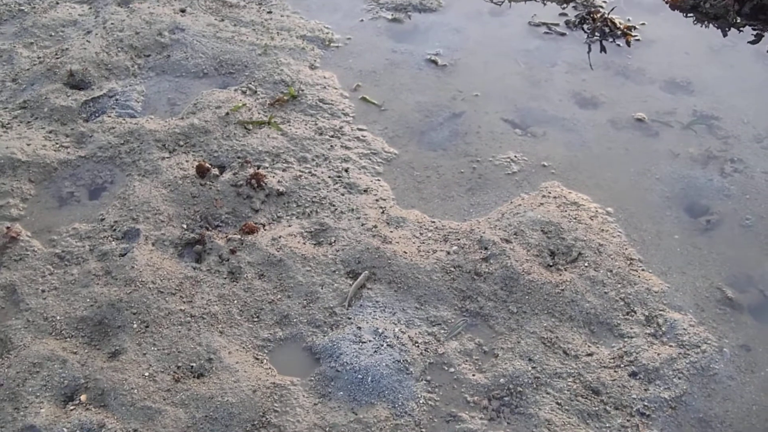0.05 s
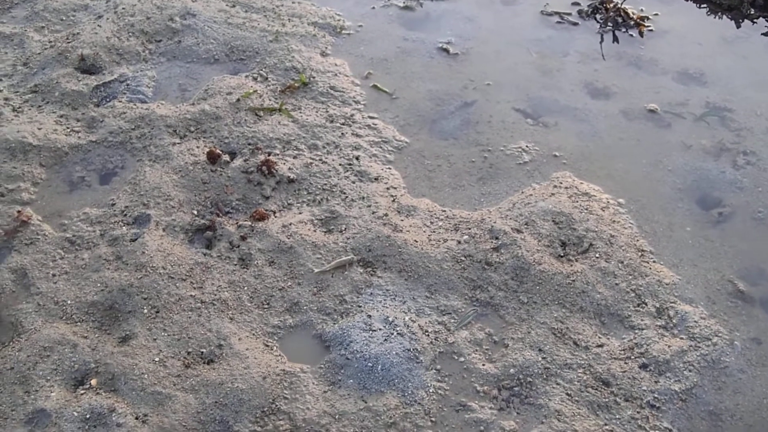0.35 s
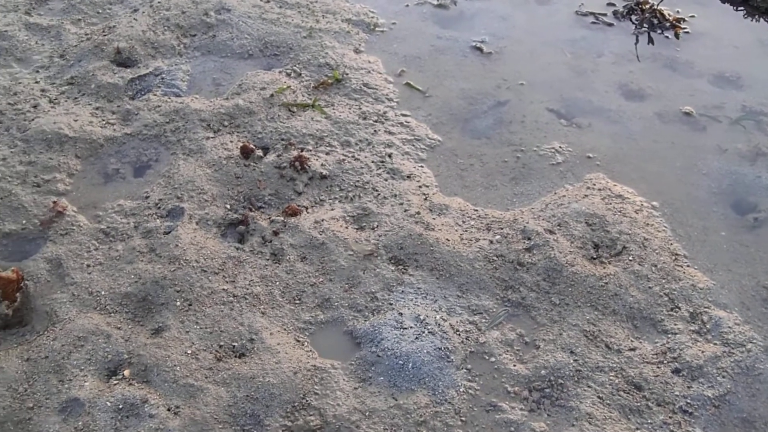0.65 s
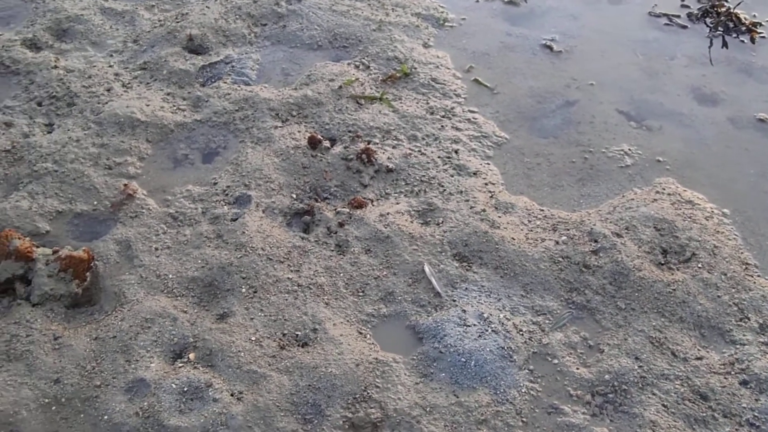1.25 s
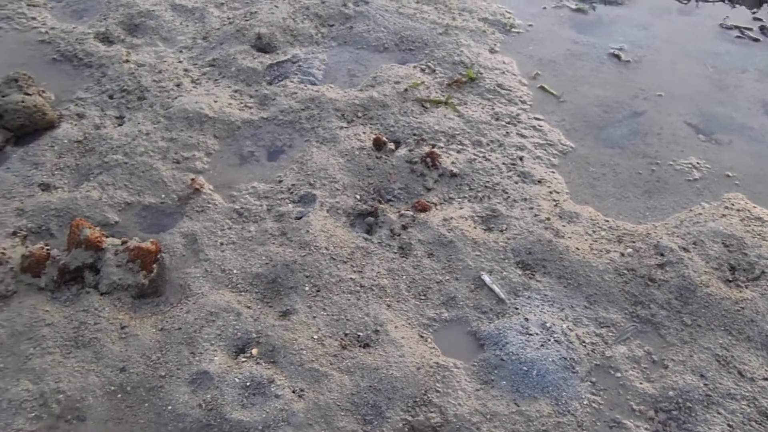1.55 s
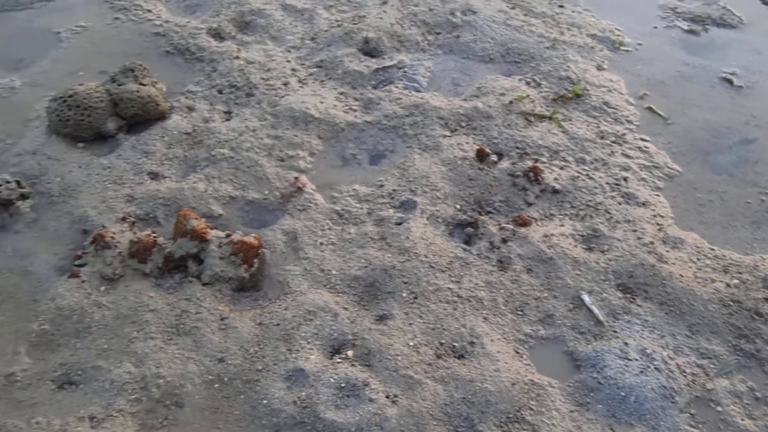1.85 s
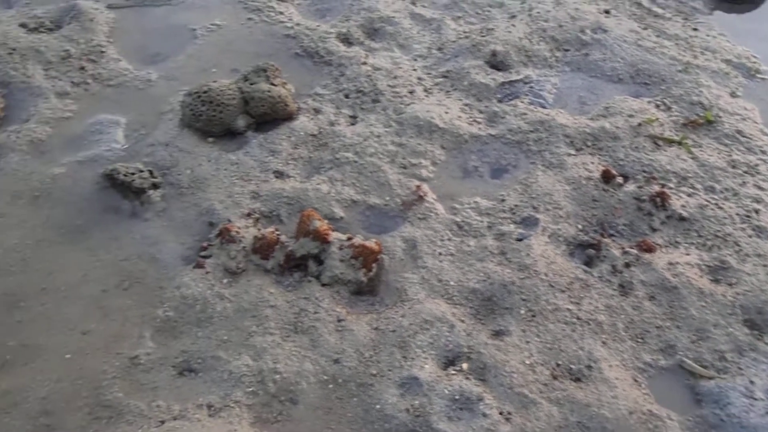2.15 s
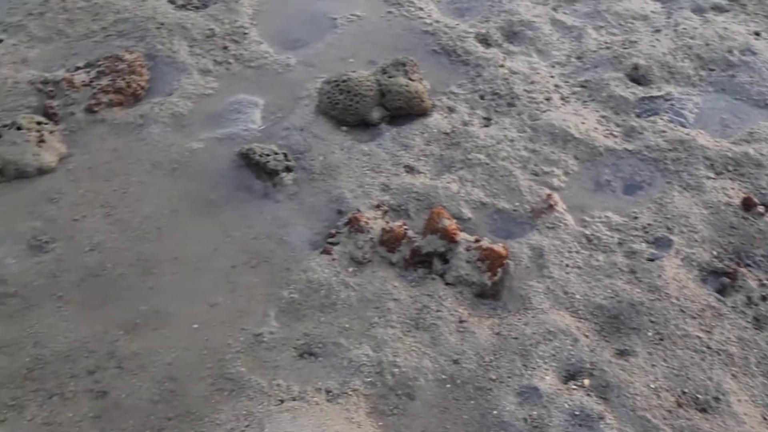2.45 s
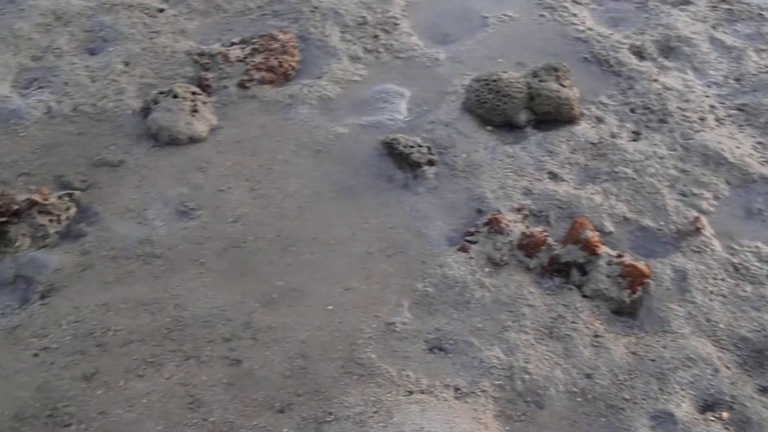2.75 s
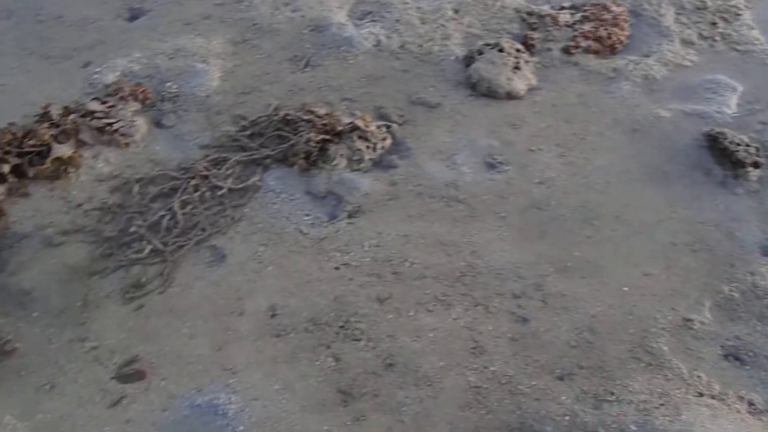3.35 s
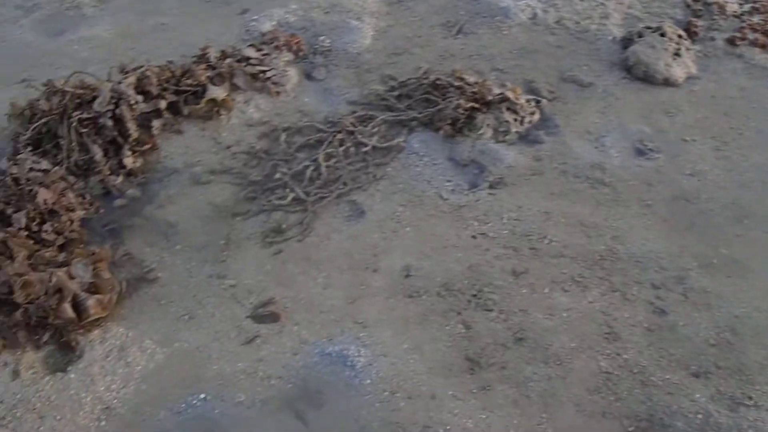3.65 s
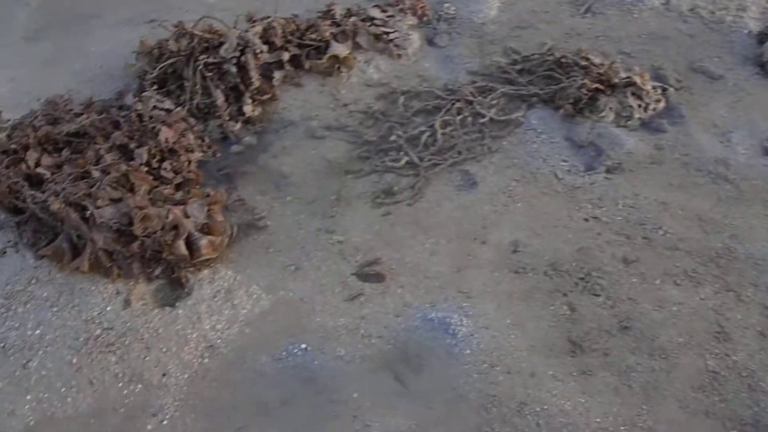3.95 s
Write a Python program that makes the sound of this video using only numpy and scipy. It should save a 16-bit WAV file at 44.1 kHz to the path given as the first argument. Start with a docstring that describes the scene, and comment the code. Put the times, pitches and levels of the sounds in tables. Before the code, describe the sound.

Draining wet sand crackles with small bursting bubbles, with far wind or surf behind.

```python
"""A wet tidal flat crackles close to a handheld camera. From the start, tiny bubbles burst in the draining
sand, nearly all on the left, and a few larger ones plop, over a soft hiss and a far rumble of wind or surf.
A low bump comes at 1.2 s. From 1.5 s the panning camera ticks faintly, probably its lens drive, and a
thin whine joins at 2.2 s. The loudest bubbles burst in a flurry near 2.8 s; a second bump follows at 3.6 s."""
import sys
import numpy as np
from scipy import signal
from scipy.io import wavfile
from scipy.ndimage import uniform_filter1d

SR = 44100
rng = np.random.default_rng(int(sys.argv[2]) if len(sys.argv) > 2 else 0)


def waveform_to_disk(signal):
    """Save audio, clipped to [-1, 1], as 16-bit WAV at the path in sys.argv[1]."""
    frames = np.transpose(np.atleast_2d(signal))
    scaled = np.clip(frames, -1, 1) * 32767
    samples = np.round(scaled).astype(np.int16)
    wavfile.write(sys.argv[1], SR, samples)


N = 176400


def amp(db):
    """Decibels to gain."""
    return 10 ** (np.asarray(db) / 20)


def unit(x):
    """Scales to rms 1."""
    return x / np.sqrt(np.mean(x ** 2) + 1e-20)


def peaked(x):
    """Scales to peak 1."""
    return x / (abs(x).max() + 1e-20)


def read(points, hz, column=1):
    """Reads one column of a table on a log-frequency axis."""
    table = np.array(points)
    return np.interp(np.log(hz + 1), np.log(table[:, 0] + 1), table[:, column])


def add(mix, start_s, sound):
    """Mixes a sound in at its start time."""
    part = mix[max(round(start_s * SR), 0):][:len(sound)]
    part += sound[:len(part)]


def colour(points, size=1024):
    """Causal impulse response of an EQ curve."""
    log_gain = np.log(amp(read(points, abs(np.fft.fftfreq(size, 1 / SR)))))
    return np.fft.ifft(np.exp(np.conj(signal.hilbert(log_gain)))).real[:size // 2]


def through(x, response):
    """Convolves and keeps the length."""
    return signal.fftconvolve(x, response)[:len(x)]


def ring(hz, rise_s, ring_s, size=1500):
    """A damped sine with a soft attack."""
    t = np.arange(size) / SR
    return (1 - np.exp(-t / rise_s)) * np.exp(-t / ring_s) * np.sin(2 * np.pi * hz * t)


def cloud(size, rise_s=0.0008, decay_s=0.0076):
    """A puff of noise that dies quickly, for spray and for scatter off the ground."""
    t = np.arange(size) / SR
    return rng.standard_normal(size) * np.exp(-t / decay_s) * np.minimum(t / rise_s, 1) ** 2


def burst(hz, swell_s, port, size=1500):
    """A film snaps softly, the cavity under it swells and dies in a rising pip, and spray follows."""
    roundness, glide, spray_db = 1.85, 0.018, -17
    age = np.arange(size) / SR / swell_s  # in swell times; the envelope peaks at 1
    pitch = hz * (1 + glide * (np.minimum(age, 2) - 1))
    envelope = age * np.exp(-age ** roundness / roundness)
    pip = peaked(envelope * np.sin(2 * np.pi * np.cumsum(pitch) / SR))
    pip[0] += .5 + rng.random()  # the film's snap
    droplet = ring(hz=6600, rise_s=0.00006, ring_s=0.00006)
    spray = through(cloud(size), droplet / np.linalg.norm(droplet))
    return peaked(through(pip + amp(spray_db) * spray, port))


def crackle():
    """Bubbles burst in the draining sand: single close pops over a fine fizz, shadowed on the right."""
    # close bursting bubbles: start_s, level_db, pitch_hz, swell_s
    pops = [(0.0438, -31, 6440, 0.00045), (0.074, -24, 7400, 0.00024), (0.2395, -33.0, 6900, 0.00063),
            (0.2946, -28, 6250, 0.00024), (0.6054, -30.5, 6950, 0.00053), (0.7607, -35.5, 6110.0, 0.0023),
            (0.8799, -18.5, 5720, 0.00033), (0.9152, -29.5, 5700, 0.00037), (1.0172, -24.5, 7760, 0.00039),
            (1.0613, -29, 5770, 0.00028), (1.0744, -25, 8060, 0.00028), (1.1413, -25.5, 7100, 0.00019),
            (1.2255, -34.5, 6860, 0.00088), (1.424, -24.5, 7550, 0.00022), (1.4312, -17, 6720.0, 0.00024),
            (1.5453, -30.0, 7170.0, 0.00014), (1.6046, -30, 7530, 0.00039), (1.768, -24.5, 6240, 0.00093),
            (1.89, -26.5, 6030.0, 0.00044), (1.9079, -21.5, 7610, 0.00037), (1.96, -26, 6300, 0.00035),
            (1.979, -21, 5950, 0.00094), (1.9924, -23.5, 6200, 0.00046), (2.046, -27, 7620, 0.00074),
            (2.1415, -17.5, 7600, 0.00025), (2.146, -25, 6200, 0.00059), (2.2821, -26, 5660, 0.00041),
            (2.3133, -32, 6920.0, 0.00035), (2.4046, -23.5, 6400, 0.00045), (2.4301, -17.5, 6880, 0.00062),
            (2.4582, -23.5, 6760, 0.00041), (2.5034, -25.5, 6050, 0.00036), (2.6194, -35.5, 5740, 0.0013),
            (2.736, -24.5, 6450.0, 0.00019), (2.752, -31.0, 6470.0, 0.00115),
            (2.7616, -17.5, 7530, 0.00042), (2.7855, -33.0, 5570.0, 0.00074), (2.7908, -25, 6570.0, 0.0004),
            (2.8053, -15, 6480.0, 0.00035), (2.8124, -6.5, 7900, 0.00036), (2.816, -30, 7500, 0.00036),
            (2.8283, -14, 6370, 0.00047), (2.8502, -23.5, 6500, 0.00022), (2.856, -29, 6170, 0.00066),
            (2.8904, -22.5, 6500, 0.00014), (2.928, -27, 6610.0, 0.00026), (2.9456, -29, 5400, 0.00028),
            (2.968, -25, 6350.0, 0.00022), (2.99, -28, 6870.0, 0.0003), (3.066, -27.5, 9140, 0.00017),
            (3.2023, -26.5, 5700, 0.00037), (3.2124, -20.5, 5840, 0.000077), (3.241, -22, 8400, 0.0002),
            (3.2606, -20.5, 7100, 0.00029), (3.2664, -34, 7100.0, 0.00025), (3.4293, -21.5, 6400, 0.00014),
            (3.435, -19.0, 5750, 0.00021), (3.4824, -33, 5600, 0.00077), (3.5015, -32, 9140.0, 0.00047),
            (3.5198, -23.5, 6330, 0.0016), (3.5681, -21.5, 6050, 0.00026), (3.5964, -27, 6520.0, 0.00023),
            (3.5996, -28, 6840, 0.00051), (3.6014, -31.0, 8180.0, 0.00068), (3.6449, -24.5, 6900, 0.00015),
            (3.7864, -19, 5800, 0.00063), (3.85, -23.5, 7250, 0.00022), (3.8622, -19.5, 6400, 0.00031),
            (3.886, -13.5, 7700, 0.00019), (3.8915, -34, 6880.0, 0.00057), (3.8951, -26.5, 7000, 0.00056),
            (3.9004, -34, 6540.0, 0.00026), (3.953, -29.0, 6550, 0.00085), (3.9755, -28, 6150, 0.00033),
            (3.9912, -19.5, 6900, 0.00022)]
    # tone of the crackle at the microphone port: frequency_hz, gain_db
    port_eq = [(100, -51), (1500, -52), (3000, -20.5), (4200, -14), (5000, 1.5), (5700, 3.5), (8200, 1),
               (9600, -6), (12000, -8), (16000, -23.5)]
    # how much crackle reaches the right side: frequency_hz, gain_db
    shadow_eq = [(1000, -12), (4000, -21), (6500, -28), (9000, -27), (16000, -20)]
    # level ride of the fizz: time_s, level_db
    fizz_ride = [(0, -62.5), (.8, -54.5), (1.3, -58), (1.7, -58.5), (1.96, -52.5), (2.5, -53),
                 (2.82, -55.5), (3.1, -64), (3.48, -49.5), (3.72, -55.5), (3.95, -46.5)]
    pop_gain_db, fizz_per_s, spread_db, low_hz, high_hz = 1.5, 300, 3, 5130, 8340
    port, left, fizz = colour(port_eq), np.zeros(N), np.zeros(N)
    for start_s, level_db, pitch_hz, swell_s in pops:
        add(left, start_s, amp(level_db + pop_gain_db) * burst(pitch_hz, swell_s, port))
    for when, size, pitch, length in rng.random((int(fizz_per_s * N / SR), 4)):
        strength = amp(spread_db * min(-np.log(1 - size), 3.8))  # many weak, a few strong, capped
        pitch_hz = low_hz + (high_hz - low_hz) * pitch
        swell_s = 0.00037 * (.5 + length)
        add(fizz, when * N / SR, strength * burst(pitch_hz, swell_s, port))
    left += unit(fizz) * amp(np.interp(np.arange(N) / SR, *np.transpose(fizz_ride)))
    return np.array([left, through(left, colour(shadow_eq))])


def plops(gain_db=4.5, right_db=-18):
    """Larger bubbles open in the mud with a dull snap or a short, lower note."""
    # larger bubbles: start_s, level_db, pitch_hz, ring_s
    bubbles = [(0.195, -37, 1290, 0.0005), (0.295, -36.5, 1270, 0.00019), (1.1398, -36, 1680, 0.00023),
               (1.2262, -29.5, 1410, 0.00055), (1.889, -36, 3770, 0.00031), (1.96, -31, 1500, 0.00059),
               (2.141, -42, 1740, 0.00055), (2.282, -37.5, 1350, 0.0014), (2.4562, -33, 1500, 0.00026),
               (2.753, -40, 4700, 0.0019), (2.8132, -37.5, 2330, 0.00027), (2.89, -43, 2680, .0012),
               (3, -36, 736, 0.0013), (3.206, -33.5, 1280, 0.0003), (3.43, -34.5, 1800, 0.00016),
               (3.556, -40.5, 1290, 0.005), (3.5699, -31.5, 430, 0.002), (3.596, -43.5, 3350, 0.00063),
               (3.9148, -36.5, 1440, 0.00036), (3.974, -38.5, 3900, 0.00097), (3.981, -41, 2000, 0.0012)]
    out = np.zeros((2, N))
    for start_s, level_db, pitch_hz, ring_s in bubbles:
        note = amp(level_db + gain_db) * peaked(ring(pitch_hz, rise_s=0.0001, ring_s=ring_s))
        add(out[0], start_s, ground_scatter(note))
        add(out[1], start_s, amp(right_db) * ground_scatter(note))
    return out


def ground_scatter(x, wet_db=-3.5):
    """Adds a brief cloud of reflections from the uneven ground."""
    reflections = unit(through(x, cloud(len(x))))
    return x + amp(wet_db) * reflections * x.std()


def ticking():
    """Regular ticks, probably the lens drive, ring one mode of the camera body, strong and weak in turn."""
    # level ride of the ticks: time_s, level_db
    tick_ride = [(1.53, -40), (1.58, -49), (1.65, -41.5), (1.87, -39.5), (2.05, -41), (2.4, -50.5),
                 (2.7, -43.5), (4, -43.5)]
    first_s, ticks_per_s, body_hz = 1.5362, 29.97, 966
    weak_db, jitter_db, right_db, right_lag_s = -2, 2.5, -8, 0.0003
    out = np.zeros((2, N))
    for k, beat_s in enumerate(np.arange(first_s, N / SR, 1 / ticks_per_s)):
        level_db = np.interp(beat_s, *np.transpose(tick_ride))
        level_db += weak_db * (k % 2) + jitter_db * rng.standard_normal()
        pitch_hz = body_hz * (1 + 0.021 * rng.standard_normal())
        tick = amp(level_db) * peaked(ring(pitch_hz, rise_s=0.00091, ring_s=0.0052))
        start_s = beat_s + 0.0004 * rng.standard_normal()
        add(out[0], start_s, tick)
        add(out[1], start_s + right_lag_s, amp(right_db) * tick)
    return out


def whine():
    """A thin, fuzzy tone swells in as the camera pans, probably also from the lens drive."""
    pitch_hz, width_hz, level_db, right_db = 6200, 85, -59.5, -9
    start_s, arch_s = 2.2, 2.8
    progress = np.clip((np.arange(N) / SR - start_s) / arch_s, 0, 1)
    swell = np.sqrt(np.maximum(np.sin(np.pi * progress), 0))
    resonance = signal.iirpeak(pitch_hz, pitch_hz / width_hz, SR)
    tone = signal.lfilter(*resonance, rng.standard_normal((2, N)))
    return amp(level_db) * swell * unit(tone) * amp([[0], [right_db]])


def bumps():
    """Soft low bumps in the centre, perhaps puffs of wind."""
    # bumps in the rumble: start_s, peak_db
    hits = [(1.175, -25.5), (3.577, -27.5)]
    bump = peaked(ring(hz=91, rise_s=0.0078, ring_s=0.014, size=6000))
    out = np.zeros(N)
    for start_s, peak_db in hits:
        add(out, start_s, amp(peak_db) * bump)
    return out


def rumble():
    """Far wind or surf: a steady, low bed of noise."""
    # tone of the rumble: frequency_hz, relative_density_db
    spectrum = [(15, -36), (25, -42), (45, -4.5), (60, -10.5), (76, 3), (105, -1.5), (135, -1.5), (185, -4),
                (270, -9.5), (344, -17), (600, -28.5), (900, -30), (1600, -35.5), (2300, -42.5),
                (3200, -45.5), (4200, -57.5), (8000, -63)]
    return wash(spectrum, level_db=-36.5, patch_db=0.75, swell_db=-0.11, size=4096)


def hiss():
    """A soft, airy bed of noise whose treble flickers slightly."""
    # tone of the hiss: frequency_hz, relative_density_db
    spectrum = [(2500, -18), (4000, -35), (4600, -6.5), (5300, -7), (6200, -0.5), (7100, -5.5), (8000, 1.5),
                (9300, -7), (11000, -8.5), (15500, -8.5), (16500, -25)]
    return wash(spectrum, level_db=-56, patch_db=2, swell_db=-0.25, size=512)


def wash(spectrum, level_db, patch_db, swell_db, size):
    """Steady noise with drifting patches and a slight swell, heard at two microphone ports."""
    # stereo image of the beds: frequency_hz, likeness (0-1), left_minus_right_db, left_lead_rad
    image = [(30.2, 0.56, -9, 0.45), (75.5, 1, 2, 0.29), (152, 0.93, 2.5, 0.22), (350, 0.91, 3.5, 0.88),
             (730, 0.8, 3, 1.34), (1310, 0.05, 2.5, 2.15), (2850, 0.06, 2, 2.8), (5700, 0.13, 3.5, 4.2),
             (11100, 0.2, 1.7, 1.3)]
    hop = size // 4
    hz = np.fft.rfftfreq(size, 1 / SR)
    left_re, left_im, side_re, side_im, patches = rng.standard_normal((N // hop + 5, len(hz), 5)).T
    patches = uniform_filter1d(patches, size=8, axis=0)  # smooth across frequency
    patches = unit(uniform_filter1d(patches, size=6, axis=1))  # and over time
    swell = unit(uniform_filter1d(rng.standard_normal(patches.shape[1]), size=14))
    likeness, balance_db, lead_rad = (read(image, hz, column)[:, None] for column in (1, 2, 3))
    left, side = left_re + 1j * left_im, side_re + 1j * side_im
    right = (likeness * left + np.sqrt(1 - likeness ** 2) * side) * np.exp(-1j * lead_rad)
    frames = np.array([left * amp(balance_db / 2), right * amp(-balance_db / 2)])
    frames *= amp(read(spectrum, hz)[:, None] + patch_db * patches + swell_db * swell)
    _, noise = signal.istft(frames, nperseg=size, noverlap=size - hop)
    return amp(level_db) * unit(noise[:, :N])


def scene():
    """Bubbles and small camera noises over the rumble and the hiss."""
    beds = rumble() + hiss()
    return crackle() + plops() + ticking() + whine() + bumps() + beds


def record(dry, cutoff_hz=15950):
    """The recorder cuts narrow notches into the sound and shaves off the very top."""
    # dips in the recorder's response: centre_hz, width_hz
    notches = [(1890, 138), (2680, 170), (3440, 66), (4290, 13), (4840, 200)]
    for centre_hz, width_hz in notches:
        dry = signal.lfilter(*signal.iirnotch(centre_hz, centre_hz / width_hz, SR), dry)
    lowpass = signal.firwin(511, cutoff_hz, window=("kaiser", 9), fs=SR)
    return signal.oaconvolve(dry, lowpass[None], "same")


dry = scene()
out = record(dry)
waveform_to_disk(out)
```